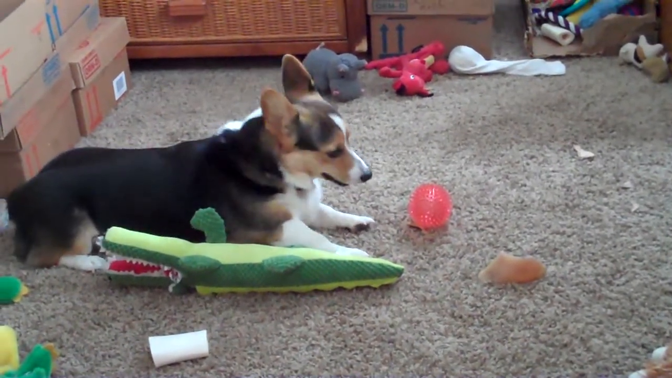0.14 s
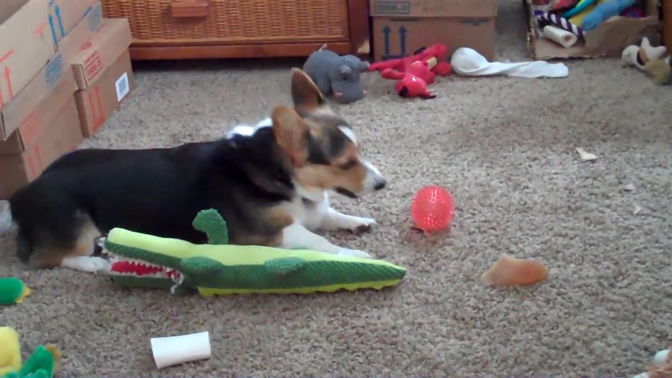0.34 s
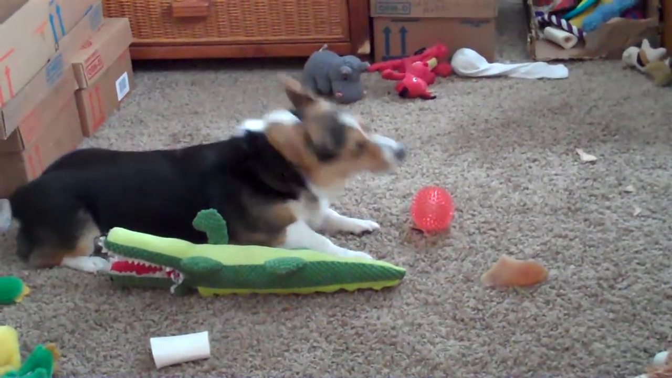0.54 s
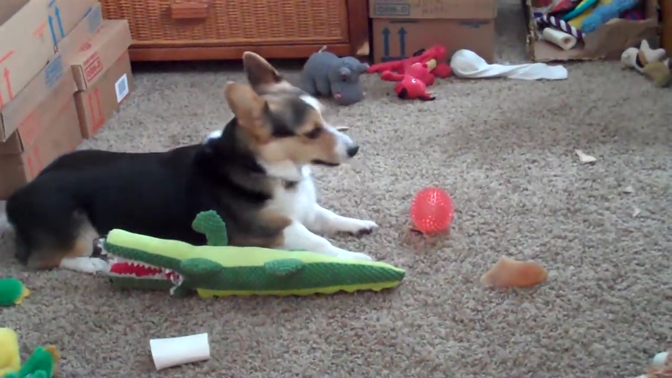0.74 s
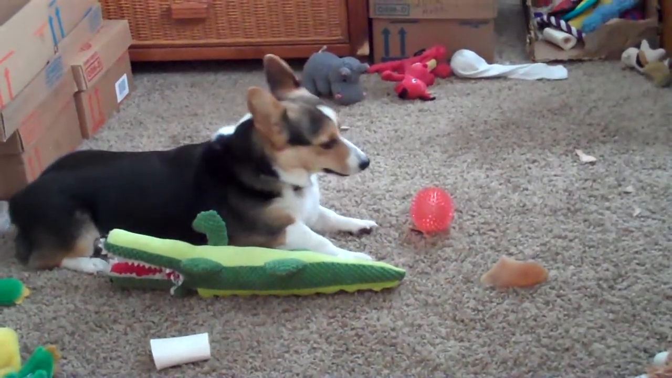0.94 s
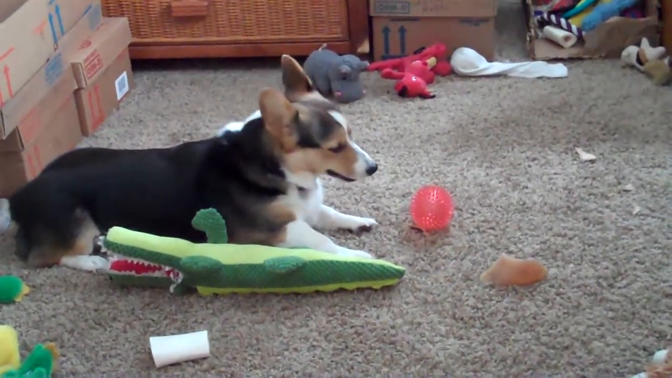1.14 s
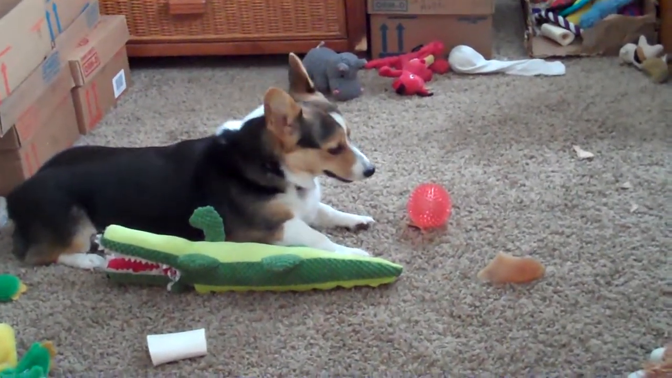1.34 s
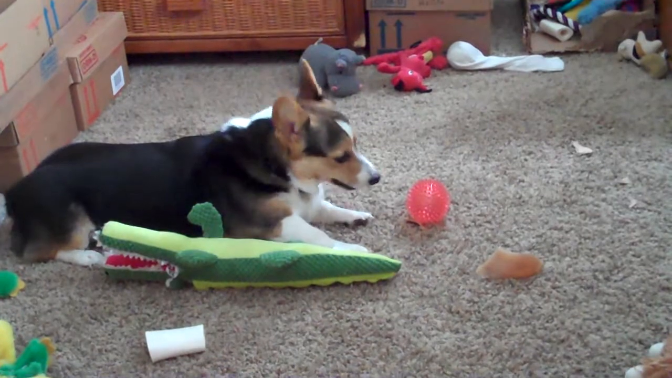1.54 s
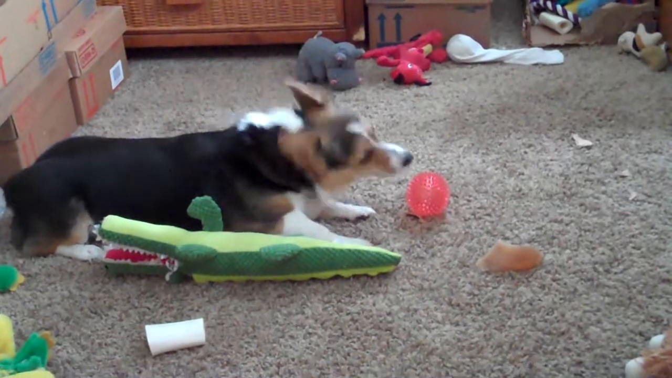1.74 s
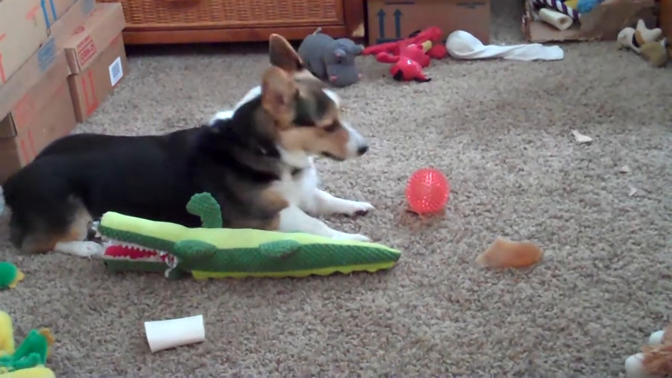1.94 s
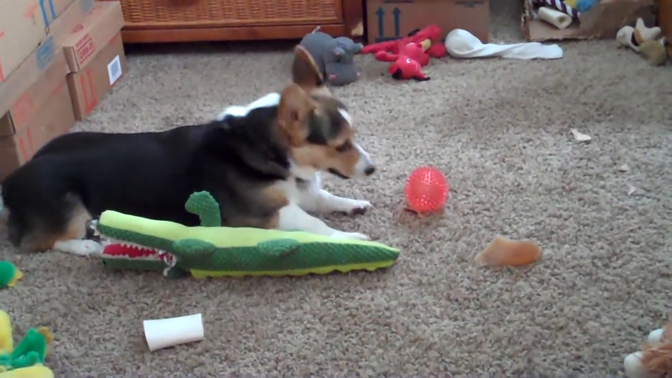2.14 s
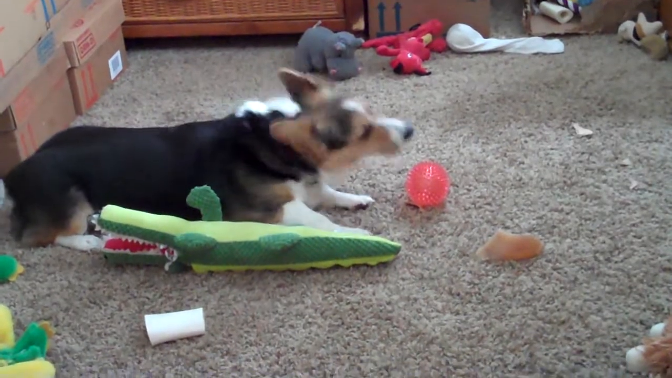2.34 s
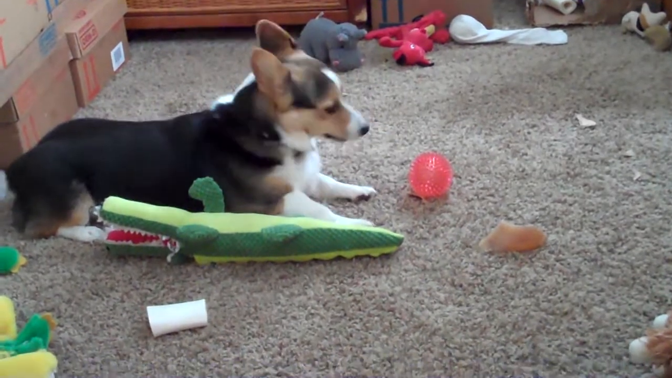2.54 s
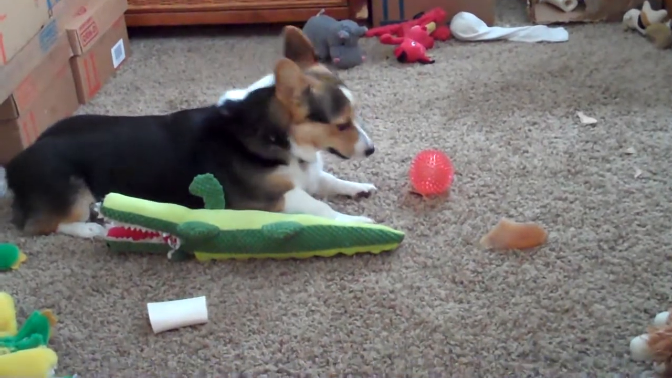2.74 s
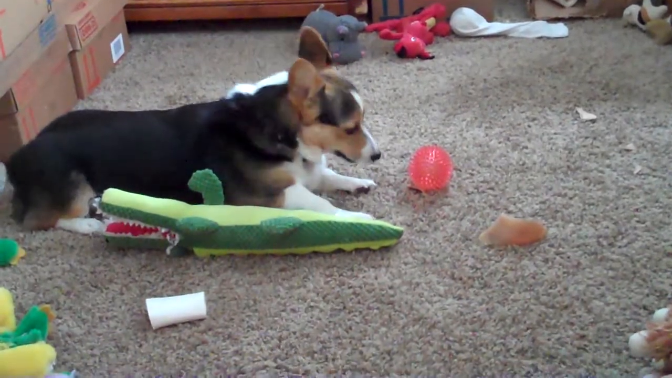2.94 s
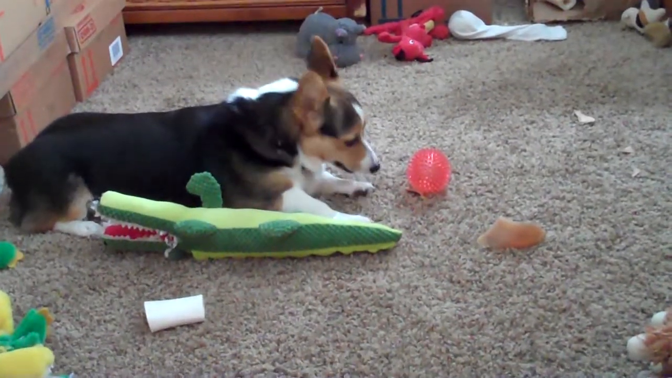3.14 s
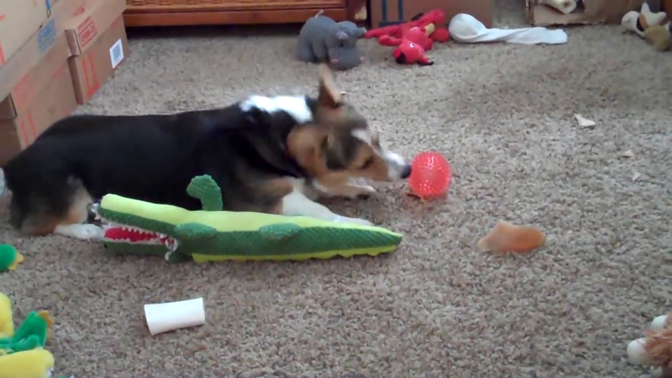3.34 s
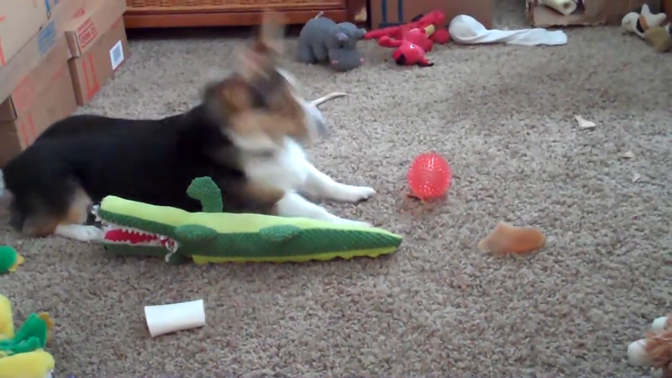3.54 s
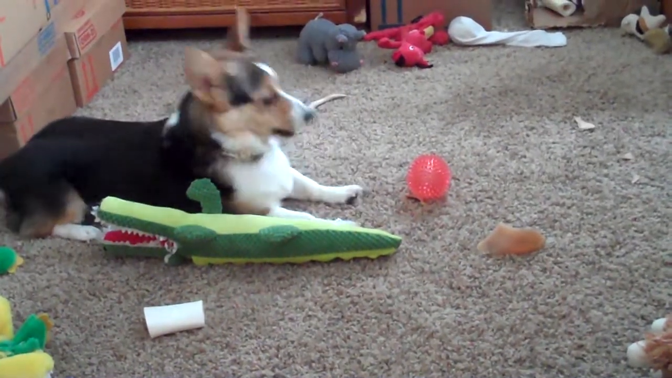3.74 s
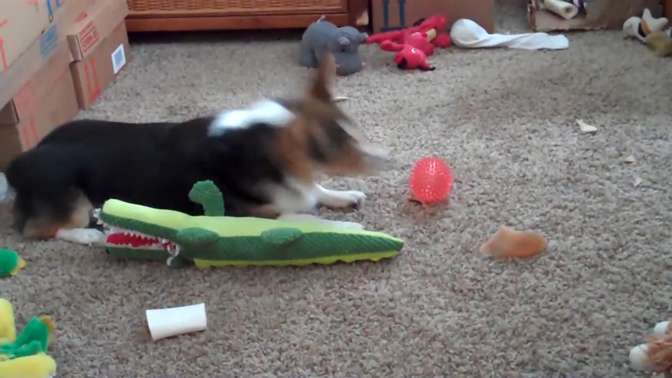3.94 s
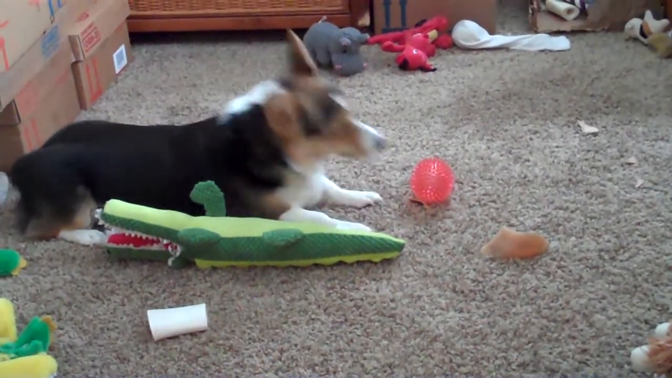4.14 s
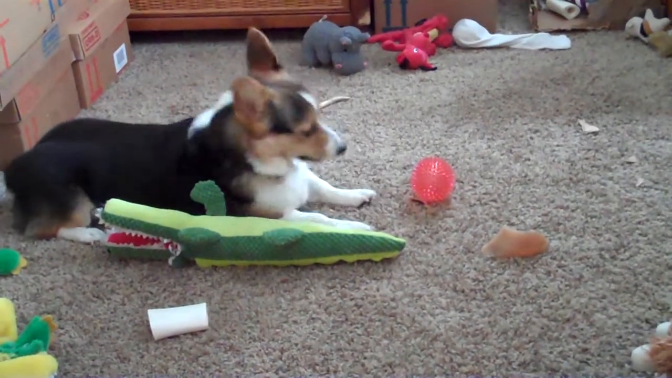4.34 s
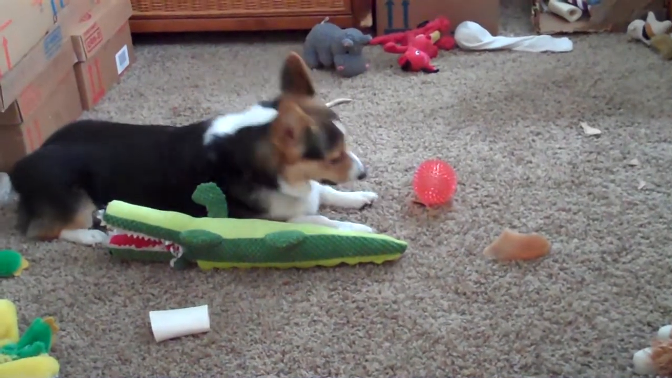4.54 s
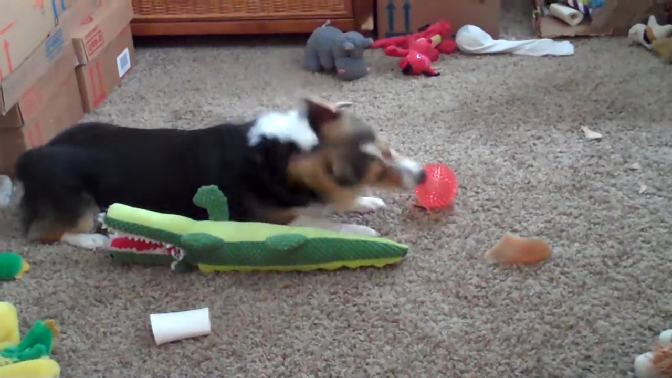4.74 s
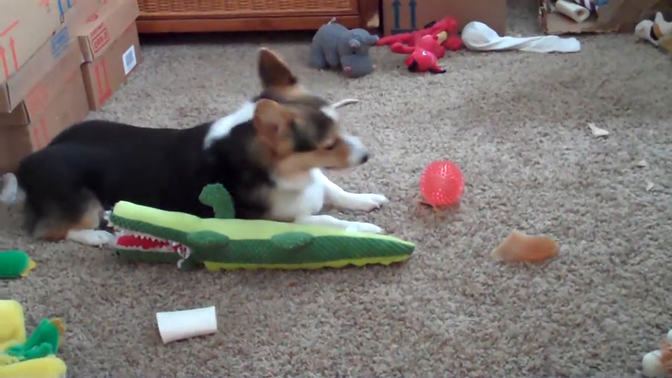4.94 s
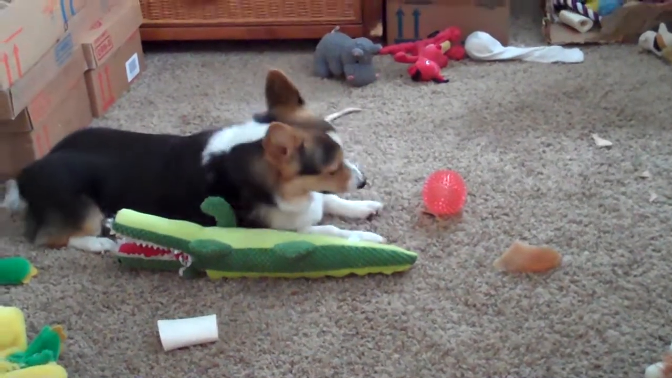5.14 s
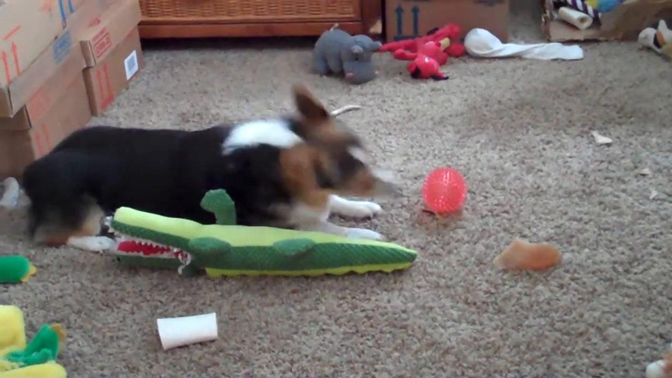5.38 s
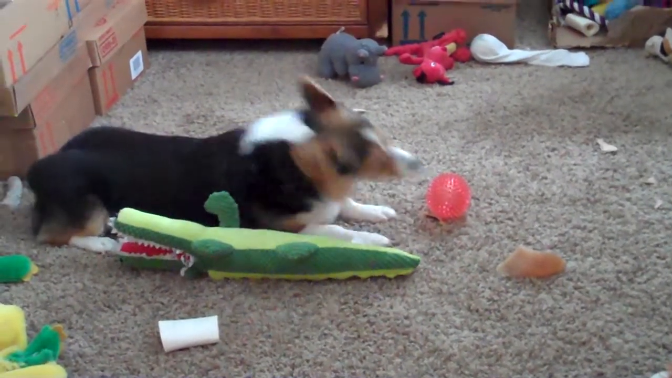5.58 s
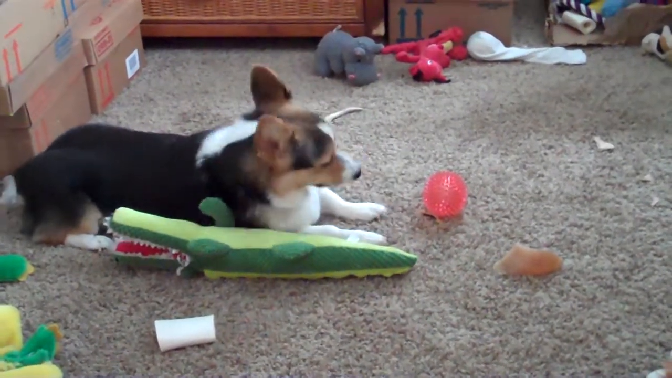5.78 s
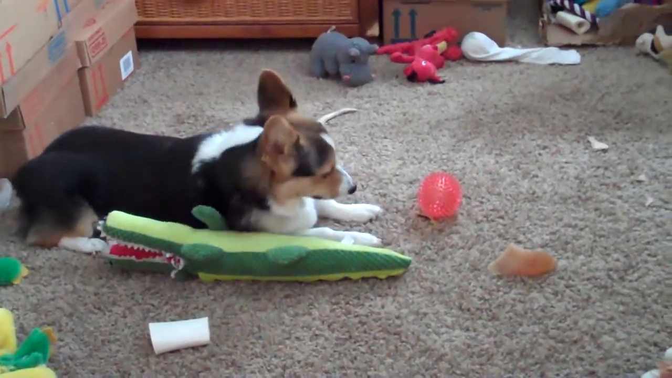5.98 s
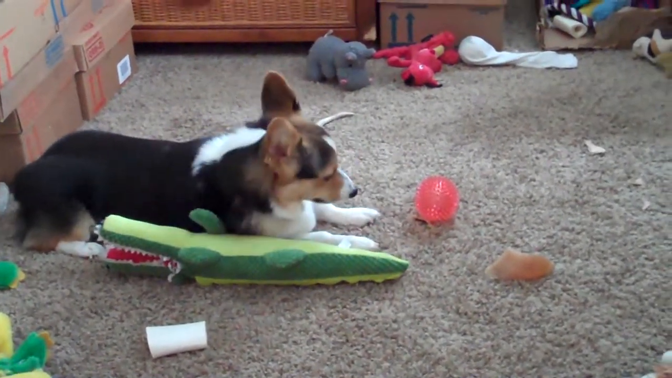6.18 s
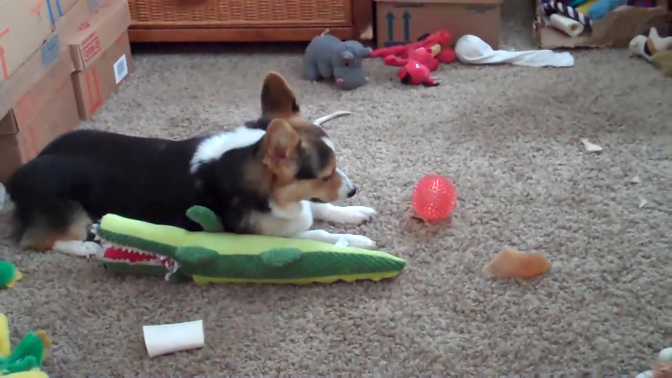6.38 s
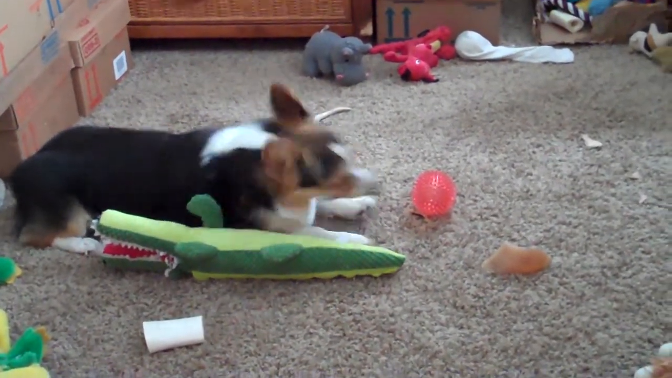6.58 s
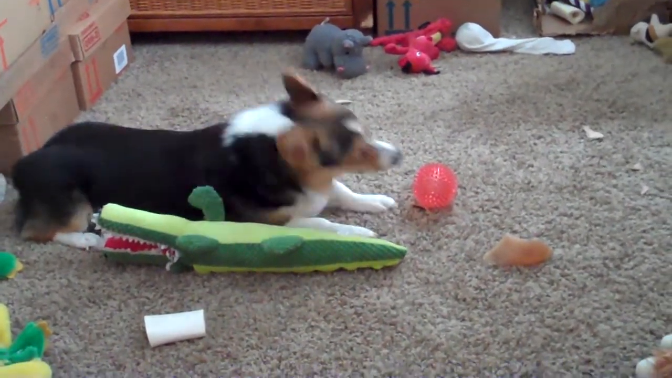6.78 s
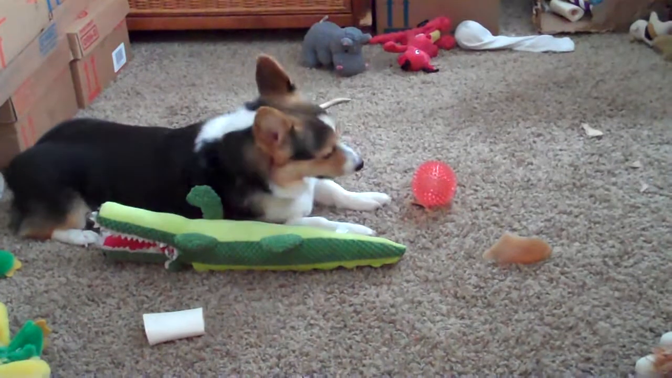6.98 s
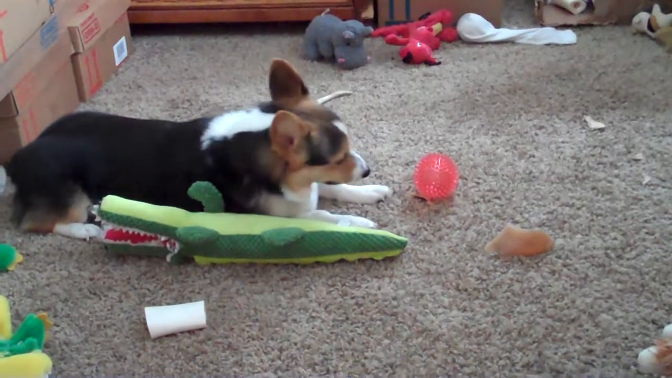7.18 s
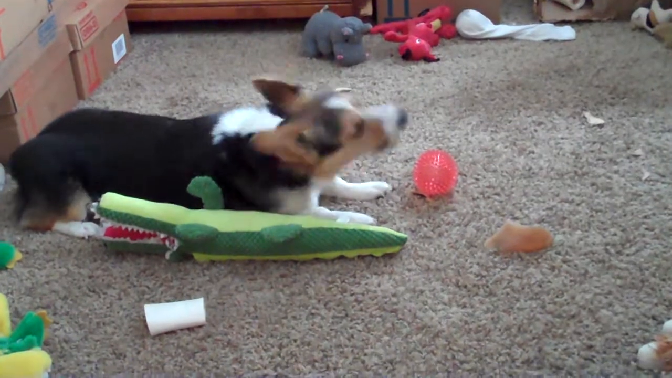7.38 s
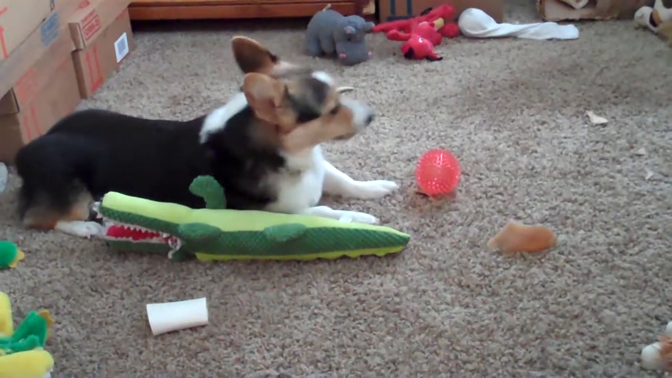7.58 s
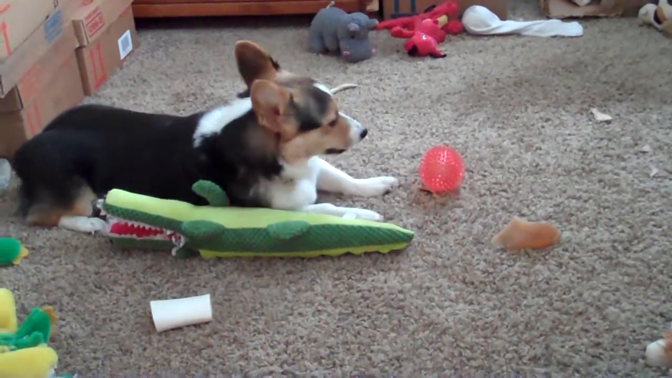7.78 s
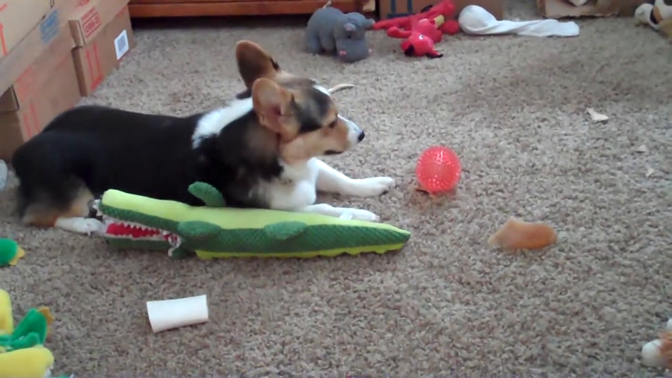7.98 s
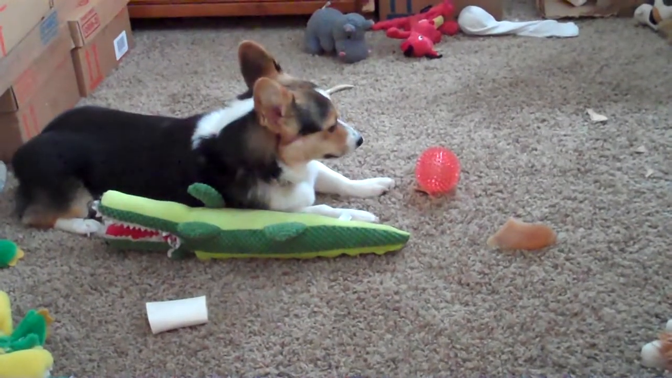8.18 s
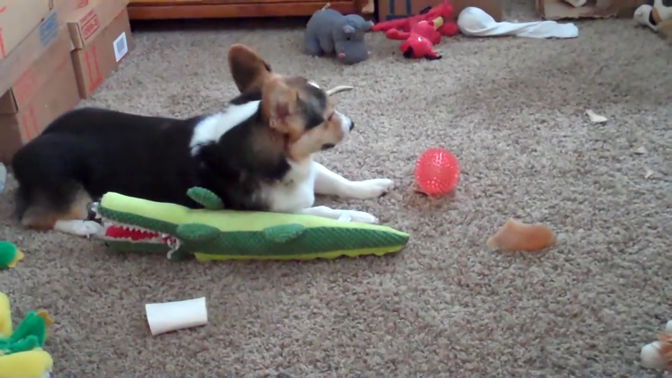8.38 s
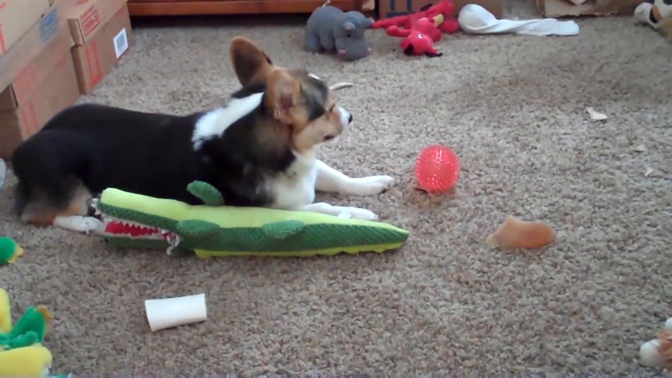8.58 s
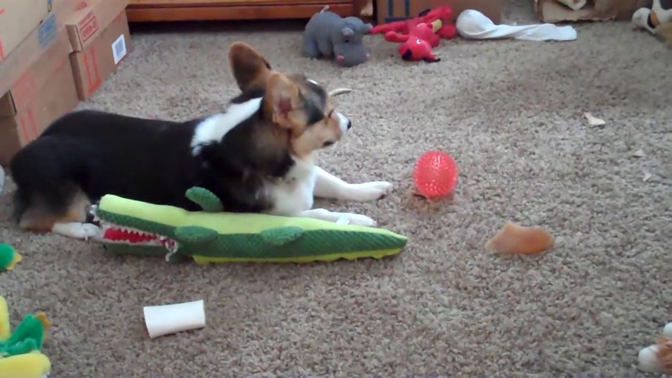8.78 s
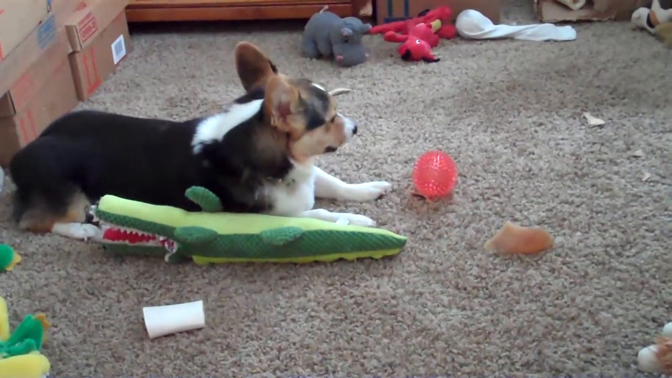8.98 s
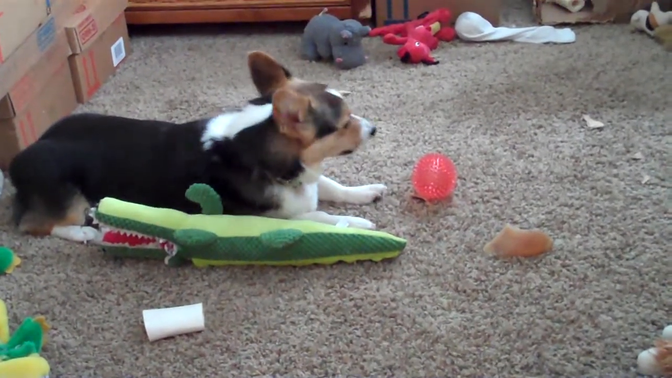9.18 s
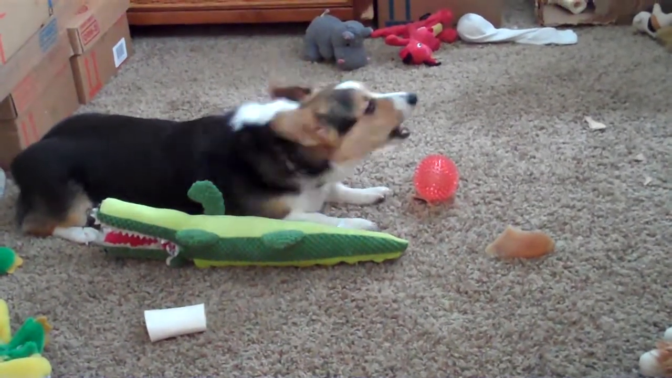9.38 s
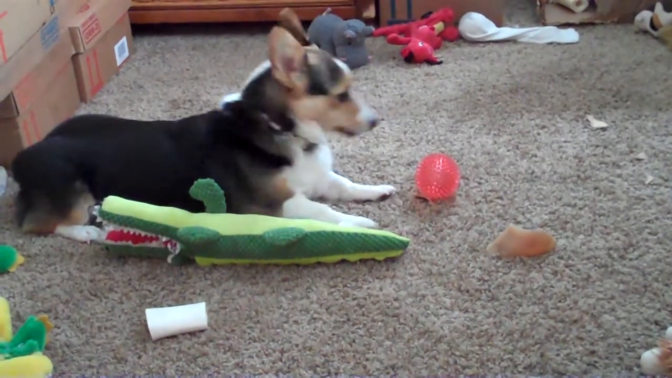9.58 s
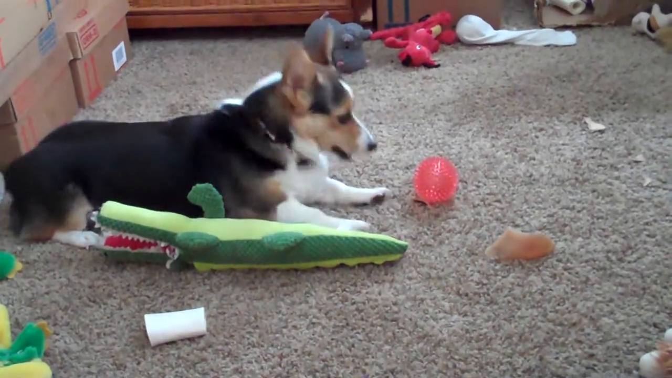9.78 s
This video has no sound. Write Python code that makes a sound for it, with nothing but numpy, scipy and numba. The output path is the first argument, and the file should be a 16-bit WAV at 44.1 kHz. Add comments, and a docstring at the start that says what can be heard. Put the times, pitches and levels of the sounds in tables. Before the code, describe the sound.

Close, sharp barks and softer gruff woofs from a small dog in a carpeted room, with short growls, sinking sighs and puffs of air between.

```python
"""A faint steady hiss fills a carpeted room; a small dog growls low close to a microphone, then barks.
Ten barks follow, several led in by growls: sharp ones start hoarse, lock into a falling tone and end in a
rasp; gruff woofs arch in pitch. Sinking sighs and short puffs of air come between them.
Pulse trains and noise drive resonances; noise bands ring as the walls; the loudest peaks are flattened."""
import sys
import numpy as np
from scipy import signal
from scipy.fft import rfft, irfft, next_fast_len
from scipy.io import wavfile
from scipy.ndimage import uniform_filter1d
from numba import njit

SR = 44100
rng = np.random.default_rng(int(sys.argv[2]) if len(sys.argv) > 2 else 0)


def transcribe(signal):
    """Save signal, clipped to [-1, 1], as a 16-bit WAV file at the path in sys.argv[1]."""
    frames = np.atleast_2d(signal).T
    limited = np.clip(frames, -1, 1)
    pcm = np.round(limited * 32767).astype(np.int16)
    wavfile.write(sys.argv[1], SR, pcm)


N = 433062

# Room hiss spectrum: [hz, relative_db_per_hz]
ROOM_HISS = [(25, 7), (60, -6), (130, -8.5), (330, -8), (700, -11), (1900, -13), (2700, -17.5), (6000, -24),
             (11000, -27.5), (15000, -42.5)]
ROOM_HISS_DB = -67

# Growls: [peak_s, rise_s, fall_s, peak_level_db, peak_lip_opening_db]
GROWLS = [(.46, 0.1, 0.21, -45.5, -10), (.535, 0.068, .02, -42, -13), (1.735, .11, 0.019, -45.5, -7.5),
          (2.37, 0.12, 0.078, -44, -6), (3.416, 0.045, 0.035, -34.5, -8), (4.745, 0.08, .02, -44, -17.5),
          (5.495, .075, 0.021, -42, -15), (6.695, 0.057, 0.024, -42, -12.5),
          (7.22, .09, 0.24, -53.5, -27.5), (7.43, .17, 0.026, -44, -13), (9.2, 0.077, 0.18, -27, -2.5),
          (9.42, 0.19, 0.09, -34.5, -8.5)]
# Growl resonances, lips closed and lips parted: [hz, width_hz, gain_db]
CLOSED_LIPS = [(195, 53, 1.5), (336.1, 50, 2), (674, 220, -4.5), (990, 340, -11.5)]
PARTED_LIPS = [(1560, 540, -3), (2550, 230, -6), (3500, 1200, -20)]
# Air past the teeth, spectrum: [hz, relative_db_per_hz]
TEETH_AIR = [(2500, -20.5), (3500, -5.5), (4300, -8), (5400, 1.5), (7500, -0.5), (10000, 2.5),
             (11500, -8.5), (13500, -15.5), (15000, -38.5)]
# Level and lip opening fall by these amounts on both sides of the peak
GROWL_DEPTH_DB, GROWL_LIPS_DB, GROWL_CURVE = 26, 8.5, 1.2

# Room ring by band: [hz, t60_s, level_db]
WALL_RING = [(150, 0.2, -12), (400, 0.44, -11), (824, 0.28, -8), (1480, 0.34, -8.5), (2260, 0.38, -8.5),
             (3400, 0.3, -8.5), (4400, 0.17, -7.5), (11000, 0.19, -6)]
# First echoes from floor, boxes and chest: [delay_s, gain]
FIRST_ECHOES = [(.0031, 0.12), (.0094, .14), (.0172, .12)]

# Sharp barks: [start_s (end of attack), attack_s, hoarse_s, tone_s, rasp_s,
#   hoarse_pitch_hz, tone_pitch_hz, sag_hz_per_s,
#   hoarse: roughness (0-1), bright_hz, throat_level_db, bright_re_throat_db,
#   tone: level_db, fade_db, mouth_re_throat_db, bright_re_throat_db,
#   rasp: level_db, roughness (0-1), mouth_re_throat_db, bright_re_throat_db, bright_hz]
SHARP_BARKS = [(0.55, 0.03, 0.025, 0.083, 0.019, 982.3, 750.4, 420, 0.81, 2750, -14, -3.5, -6.5, 11.5, -8.5, -15, -27, .14, -5.5, -5, 2200),
               (4.756, .027, .04, 0.032, 0.055, 885, 856, 2676, .88, 2740, -13, -5, -5.5, 1, -29.5, -20.5, -27, .4, -2, -0.5, 2330),
               (5.509, .028, .033, 0.047, .05, 902.3, 870, 2364, 0.83, 2915, -12.5, -6, -6, 2, -32, -22.5, -28, .4, 0.5, 4.5, 2300),
               (6.703, 0.031, 0.033, 0.051, .06, 880, 871.3, 2115, 0.76, 2825, -13.5, -5, -6, 2.5, -31, -16, -26.5, 0.49, 1, 4.5, 2340),
               (7.472, 0.068, .016, .047, .066, 690, 756.5, 302.6, .7, 2480, -16, 1.5, -6.5, 7, -10, -12.5, -21.5, 0.91, 7, -5, 2040),
               (9.465, .05, 0.0165, 0.055, 0.058, 680, 756, 162, 0.71, 2500, -18, 2.5, -3.5, 27, -11.5, -14, -20, .93, 3.5, -6, 1850)]
# Bark resonances; throat and mouth centres with the jaw not gaping
THROAT_HZ, THROAT_WIDTH_HZ = 768, 453
MOUTH_HZ, MOUTH_WIDTH_HZ = 1500, 460
EDGE_HZ, EDGE_WIDTH_HZ = 3250, 590
BRIGHT_WIDTH_HZ = 700
GAPE_BRIGHT_HZ, CLOSING_BRIGHT_HZ = 2760, 2320
# Jaw wide open: throat and bright are added to the hoarse values, mouth is re throat
GAPE_THROAT_DB, GAPE_MOUTH_DB, GAPE_BRIGHT_DB = 1.5, 1.5, 0.5
# Sharp-bark onset and lead, just before the snap
ONSET_DB, LEAD_DB, RELEASE_DB = -27.5, -12, -18
HOARSE_MOUTH_DB, LEAD_BRIGHT_DB = -8.5, -8
EDGE_PITCH_RATIO = 0.9  # at the start of a bark or woof and the end of a sharp bark
SNAP_SHARE = 0.4  # of the attack
LOCK_S, BREAK_S, RELEASE_S = 0.008, 0.0085, 0.03
# Overtones keep this share of the dB that the tone loses
TONE_ROUGHNESS, OVERTONE_SHARE = 0.035, 0.6
# End of the rasp; pitch is re end of tone
RASP_FADE_DB, CLOSED_MOUTH_DB, CLOSED_BRIGHT_DB = 2.5, -9, -12.5
RASP_PITCH_RATIO, CLOSED_ROUGHNESS = 0.81, 0.45

# Voice sinking as a bark runs out: [start_s, length_s, first_pitch_hz, level_db]
SIGHS = [(0.658, 0.11, 272, -53.5), (1.856, 0.21, 302, -49), (2.523, 0.17, 312, -44),
         (3.524, 0.12, 240, -46.5), (4.201, 0.11, 299.4, -42.5), (4.865, .13, 553, -45.5),
         (5.614, .14, 555, -47), (6.826, 0.14, 553, -47.5), (7.604, 0.099, 298, -57),
         (9.604, 0.1, 303.6, -45.5)]
SIGH_OCTAVES_PER_S = 6.5

# Air from the muzzle: [centre_s (peak of the swell), spread_s (Gaussian spread; the puff sounds for two spreads
# on each side of the peak), level_db, hz]
PUFFS = [(1.105, 0.026, -65, 1460), (3.636, 0.028, -53, 1611), (4.087, 0.023, -44, 1107),
         (4.121, 0.021, -45.5, 2226), (4.308, 0.056, -46.5, 1420), (6.073, 0.1, -71, 1400),
         (8.038, 0.05, -64.5, 1400)]
# Air through the muzzle, spectrum: [hz, relative_db_per_hz]
MUZZLE_AIR = [(200, -14), (480, -7.5), (750, -7), (1700, -4), (2400, 0), (3300, -8), (4500, -21),
              (6300, -16.5), (9500, -25.5), (13000, -32), (15000, -43)]

# Gruff woofs, some run together: [start_s (end of attack), attack_s, hold_s, release_s,
#   pitch_hz, pitch_arch (share), roughness (0-1), level_db,
#   mouth_re_throat_db, bright_re_throat_db, bright_hz]
WOOFS = [(1.76, 0.029, 0.013, 0.06, 488, .03, 0.45, -21.5, -10.5, -3.5, 2760),
         (1.796, 0.011, 0.018, .016, 497.7, 0.034, 0.09, -13.5, -8, -4.5, 2850),
         (1.82, 0.012, 0.025, 0.058, 523.3, 0.024, .24, -24, 3, 6, 2680),
         (2.416, 0.038, 0.019, 0.045, 710.5, .01, 0.84, -24, -3.5, -5, 2920),
         (2.449, 0.013, .016, 0.019, 750.6, 0.0053, 0.39, -15, -5.5, -6, 2625),
         (2.479, .014, .045, .05, 491.5, 0.017, 0.33, -23, 5, 4, 2670),
         (3.445, 0.034, 0.0575, 0.0793, 391.9, 0.028, 0.74, -18, -5.5, -6, 2734),
         (4.197, .038, .03, 0.049, 649, 0.016, 0.6, -20, -3.5, -2.5, 2640)]
# Level re peak at the start, end of hold and end of release
WOOF_ONSET_DB, WOOF_SAG_DB, WOOF_END_DB = -21.5, -3.5, -20
WOOF_OPENING_DB, WOOF_JAW_HZ = 2.5, 112.7  # swing to either side of the middle of the hold
WOOF_END_PITCH_RATIO, WOOF_EDGE_ROUGHNESS = 0.81, 0.72

OVERLOAD_PEAK = 0.68
TOP_HZ = 15000


def undb(db):
    """Decibels to gain."""
    return 10 ** (np.asarray(db) / 20)


def unit(x):
    """Scale to rms 1."""
    return x / np.sqrt(np.mean(x ** 2))


def even(x, size=360):
    """Hold the short-term rms near 1, keeping the fast flutter."""
    power = uniform_filter1d(uniform_filter1d(x ** 2, size), size // 2)
    return x / np.sqrt(np.abs(power) + 1e-12)


def wobble(n, hz):
    """Random line of rms 1 through hz new values a second."""
    values = rng.standard_normal(2000)
    return unit(np.interp(np.arange(n) * hz / SR, np.arange(2000), values))


def colour(x, points):
    """Filter by a spectrum of (Hz, dB) points; rms 1."""
    hz, db = np.transpose(points)
    size = next_fast_len(len(x))
    bin_hz = np.arange(size // 2 + 1) * SR / size
    gain = undb(np.interp(np.log(bin_hz + 1), np.log(hz), db))
    return unit(irfft(rfft(x, size) * gain, size)[:len(x)])


def low_pass(x, hz, order=8):
    """Steep roll-off above hz."""
    return signal.sosfilt(signal.butter(order, hz, fs=SR, output="sos"), x)


@njit
def moving_band_pass(x, hz, width_hz):
    """State-variable band-pass with a moving centre."""
    out, band, low = np.empty(len(x)), 0., 0.
    for i in range(len(x)):
        g = np.tan(np.pi * hz[i] / SR)
        damping = width_hz / hz[i]
        v = (band + g * (x[i] - low)) / (1 + g * (g + damping))
        band = 2 * v - band
        low += 2 * g * v
        out[i] = damping * v
    return out


def resonance(x, hz, width_hz):
    """A band-pass applied twice, for dark valleys."""
    centre_hz = hz * np.ones(len(x))
    once = moving_band_pass(x, centre_hz, float(width_hz))
    return moving_band_pass(once, centre_hz, float(width_hz))


def stages(lengths_s, *controls):
    """Each control moves in straight lines through its values, one stage after another."""
    corners_s = np.concatenate([[0], np.cumsum(np.abs(lengths_s))])
    t = np.arange(int(corners_s[-1] * SR)) / SR
    return [np.interp(t, corners_s, values) for values in controls]


def add(track, start_s, sound):
    """Mix a sound in at start_s with softened ends."""
    start = int(start_s * SR)
    part = (sound * signal.windows.tukey(len(sound), 0.06))[:N - start]
    track[start:start + len(part)] += part


def quiet():
    """Steady coloured noise that wavers a little in level."""
    level_db = ROOM_HISS_DB + 0.17 * wobble(N, 1)
    return colour(rng.standard_normal(N), ROOM_HISS) * undb(level_db)


def folds(hz, rough, jitter, shimmer_db, flutter_hz, count):
    """Vocal folds: a pulse train that grows uneven with roughness, plus air let through once a cycle."""
    n = len(hz)
    uneven_hz = hz * (1 + jitter * rough * wobble(n, flutter_hz))
    phase = 2 * np.pi * np.cumsum(uneven_hz) / SR
    pulses = sum(np.cos(k * phase) for k in range(1, count + 1))
    air = unit(rng.standard_normal(n) * (1 + np.cos(phase))) * np.sqrt(SR / hz / 4)
    mix = np.sqrt(1 - rough ** 2) * pulses + rough * air
    return mix * undb(shimmer_db * rough * wobble(n, flutter_hz))


def growl(rise_s, fall_s, peak_db, lips_db, pitch_hz=115):
    """Slow fold pulses behind closed lips; parting them adds roughness and lets air through upper resonances."""
    away = stages([rise_s, fall_s], [1, 0, 1])[0] ** GROWL_CURVE
    level_db = peak_db - GROWL_DEPTH_DB * away
    open_db = lips_db - GROWL_LIPS_DB * away
    n = len(level_db)
    rough = np.interp(open_db, [-20, -6], [0.35, 0.75])
    source = folds(np.full(n, pitch_hz), rough, jitter=0.034, shimmer_db=1.0, flutter_hz=111.7, count=36)
    airy = unit(source) + rng.standard_normal(n)
    closed = sum(undb(db) * resonance(source, hz, width) for hz, width, db in CLOSED_LIPS)
    closed = unit(low_pass(closed, 1300))
    parted = sum(undb(db) * resonance(airy, hz, width) for hz, width, db in PARTED_LIPS)
    parted = unit(low_pass(parted, 4300))
    # the throat resonance also grows as the mouth opens
    throat = unit(low_pass(resonance(source, 660, 310), 1100))
    hiss = colour(rng.standard_normal(n), TEETH_AIR)
    body = even(closed + undb(open_db + 14.0) * throat, size=1200)
    escaping = undb(open_db) * (parted + undb(-16.0) * hiss)
    return undb(level_db) * (body + escaping)


def room(dry, build_s=0.004):
    """Direct sound, a few first echoes, and a diffuse ring that dies at its own rate in each band."""
    t = np.arange(int(0.7 * SR)) / SR
    noise = rfft(rng.standard_normal(len(t)))
    log_hz = np.log(np.arange(len(noise)) * SR / len(t) + 1)
    log_centres = np.log([row[0] for row in WALL_RING])
    response = np.zeros(len(t))
    for pick, (_, t60_s, db) in zip(np.eye(len(WALL_RING)), WALL_RING):
        band = irfft(noise * np.interp(log_hz, log_centres, pick), len(t))
        decay = np.exp(-np.log(1000) * t / t60_s) * (1 - np.exp(-t / build_s))
        response += undb(db) * band * decay / np.sqrt(np.sum(decay ** 2))
    response[0] += 1
    for delay_s, gain in FIRST_ECHOES:
        response[int(delay_s * SR)] += gain
    return signal.fftconvolve(dry, response)[:N]


def bark(hz, rough, db, mouth_db, bright_db, bright_hz):
    """The folds drive four resonances: throat and mouth shift with the gape, bright moves, edge stays."""
    rough, n = np.clip(rough, 0.01, 0.95), len(hz)
    source = folds(hz, rough, jitter=0.07, shimmer_db=3.5, flutter_hz=422.1, count=8)
    # the tract passes little below its first resonance or above its last
    source = signal.sosfilt(signal.butter(4, 390, "high", fs=SR, output="sos"), source)
    source = low_pass(source, 3375, order=14)
    # a high, rough push gapes the jaw: the two low resonances draw together
    gape = rough * np.clip((hz - 770) / 110, 0, 1)
    throat = even(resonance(source, THROAT_HZ + 130 * gape, THROAT_WIDTH_HZ))
    mouth = even(resonance(source, MOUTH_HZ - 260 * gape, MOUTH_WIDTH_HZ))
    # the upper resonances carry more turbulence
    turbulence = unit(low_pass(rng.standard_normal(n), 3430, order=14))
    breathy = even(source) + 0.55 * rough ** 0.8 * turbulence
    edge = undb(-2.5) * rough ** (2 / 3) * resonance(breathy, EDGE_HZ, EDGE_WIDTH_HZ)
    bright = even(resonance(breathy, bright_hz, BRIGHT_WIDTH_HZ) + edge)
    hiss_db = -21.0 + 0.87 * bright_db + 2.5 * wobble(n, 350)
    hiss = colour(rng.standard_normal(n), TEETH_AIR) * rough ** 0.27 * undb(hiss_db)
    voice = undb(db) * (throat + undb(mouth_db) * mouth + undb(bright_db) * bright + hiss)
    # slack, uneven cycles rumble in the chest, mostly in the low-pitched barks
    slack = rough * np.clip((900 - hz) / 300, 0.1, 1)
    swell = signal.windows.tukey(n, 0.5)
    rumble = unit(resonance(rng.standard_normal(n), 290, 150))
    chest = swell * slack * undb(-37.5 + 0.25 * db) * rumble
    fade = np.interp(np.arange(n) / SR, [0, 0.01, n / SR - 0.018, n / SR], [0, 1, 1, 0])
    return (voice + chest) * fade


def sharp_bark(attack_s, hoarse_s, tone_s, rasp_s, hoarse_hz, tone_hz, sag_hz_per_s,
               rough, start_hz, hoarse_db, bright_db,
               tone_db, fade_db, tone_mouth_db, tone_bright_db,
               rasp_db, rasp_rough, rasp_mouth_db, rasp_bright_db, end_hz):
    """The jaw snaps open hoarse, the folds lock into a sagging tone, then rasp as the mouth closes."""
    low_hz = tone_hz - sag_hz_per_s * tone_s
    lift_db = OVERTONE_SHARE * fade_db
    closing_hz = low_hz * RASP_PITCH_RATIO
    lock_bright_hz = (GAPE_BRIGHT_HZ + CLOSING_BRIGHT_HZ) / 2
    # each state: pitch, roughness, throat level, mouth and bright shares, bright centre
    onset = (hoarse_hz * EDGE_PITCH_RATIO, rough, hoarse_db + ONSET_DB,
             HOARSE_MOUTH_DB, LEAD_BRIGHT_DB, start_hz)
    lead = (hoarse_hz, rough, hoarse_db + LEAD_DB, HOARSE_MOUTH_DB, LEAD_BRIGHT_DB, start_hz)
    hoarse = (hoarse_hz, rough, hoarse_db, HOARSE_MOUTH_DB, bright_db, start_hz)
    gaping = (hoarse_hz, rough, hoarse_db + GAPE_THROAT_DB,
              GAPE_MOUTH_DB, bright_db + GAPE_BRIGHT_DB, GAPE_BRIGHT_HZ)
    locked = (tone_hz, TONE_ROUGHNESS, tone_db, tone_mouth_db, tone_bright_db, lock_bright_hz)
    sagged = (low_hz, TONE_ROUGHNESS, tone_db - fade_db,
              tone_mouth_db + lift_db, tone_bright_db + lift_db, CLOSING_BRIGHT_HZ)
    broken = (low_hz, rasp_rough, rasp_db, rasp_mouth_db, rasp_bright_db, end_hz)
    raspy = (low_hz * (1 + RASP_PITCH_RATIO) / 2, rasp_rough, rasp_db - RASP_FADE_DB / 2,
             rasp_mouth_db, rasp_bright_db - RASP_FADE_DB, end_hz)
    closing = (closing_hz, CLOSED_ROUGHNESS, rasp_db - RASP_FADE_DB,
               CLOSED_MOUTH_DB, CLOSED_BRIGHT_DB, CLOSING_BRIGHT_HZ)
    closed = (closing_hz * EDGE_PITCH_RATIO, CLOSED_ROUGHNESS, rasp_db + RELEASE_DB,
              CLOSED_MOUTH_DB, CLOSED_BRIGHT_DB, CLOSING_BRIGHT_HZ)
    lengths_s = [attack_s * (1 - SNAP_SHARE), attack_s * SNAP_SHARE, hoarse_s, LOCK_S,
                 tone_s - LOCK_S, BREAK_S, rasp_s / 2, rasp_s / 2, RELEASE_S]
    states = [onset, lead, hoarse, gaping, locked, sagged, broken, raspy, closing, closed]
    return bark(*stages(lengths_s, *zip(*states)))


def sigh(length_s, first_hz, db):
    """Slackening folds glide down unevenly with only three harmonics."""
    n = int(length_s * SR)
    glide_hz = first_hz * 2 ** (-SIGH_OCTAVES_PER_S * np.arange(n) / SR)
    phase = 2 * np.pi * np.cumsum(glide_hz * (1 + 0.08 * wobble(n, 200))) / SR
    tone = np.sin(phase) + np.sin(2 * phase) + undb(-3.5) * np.sin(3 * phase)
    swell = np.interp(np.linspace(0, 1, n), [0, 0.25, 1], [0, 1, 0])
    return tone * undb(db + 3.2 * wobble(n, 150)) * swell


def puff(spread_s, db, hz):
    """Unvoiced air swells and fades through the muzzle, partly through one resonance."""
    reach = int(2 * spread_s * SR)
    t = np.arange(-reach, reach) / SR
    air = rng.standard_normal(len(t))
    swell = np.exp(-(t / spread_s) ** 2 / 2)
    breath = colour(air, MUZZLE_AIR) + 0.43 * unit(resonance(air, hz, 260))
    return undb(db) * swell * unit(breath)


def woof(attack_s, hold_s, release_s, hz, arch, rough, db, mouth_db, bright_db, bright_hz):
    """A softer push: pitch arches a little, the edges are rough, mouth and bright shares rise with opening."""
    pitch_ratio, rough, push_db, opening = stages(
        [attack_s, hold_s / 2, hold_s / 2, release_s],
        [EDGE_PITCH_RATIO, 1 - arch, 1 + arch, 1, WOOF_END_PITCH_RATIO],
        [WOOF_EDGE_ROUGHNESS, rough, rough, rough, WOOF_EDGE_ROUGHNESS],
        [WOOF_ONSET_DB, 0, 0, WOOF_SAG_DB, WOOF_END_DB],
        [-1, -1, 0, 1, 0])
    open_db = WOOF_OPENING_DB * opening
    moving_hz = bright_hz - WOOF_JAW_HZ * opening
    return bark(hz * pitch_ratio, rough, db + push_db, mouth_db + open_db, bright_db + open_db, moving_hz)


def scene():
    """The dog in its room."""
    dog = np.zeros(N)
    for peak_s, rise_s, *shape in GROWLS:
        add(dog, peak_s - rise_s, growl(rise_s, *shape))
    for start_s, attack_s, *shape in SHARP_BARKS:
        add(dog, start_s - attack_s, sharp_bark(attack_s, *shape))
    for start_s, *shape in SIGHS:
        add(dog, start_s, sigh(*shape))
    for centre_s, spread_s, db, hz in PUFFS:
        add(dog, centre_s - 2 * spread_s, puff(spread_s, db, hz))
    for start_s, attack_s, *shape in WOOFS:
        add(dog, start_s - attack_s, woof(attack_s, *shape))
    return (room(dog) + quiet())[None]


def record(dry):
    """The microphone flattens the loudest peaks, slightly unequally by side; the top is cut."""
    limit = OVERLOAD_PEAK * (1 + 0.0055 * np.tanh(3 * dry))
    held = dry / (1 + (dry / limit) ** 8) ** (1 / 8)
    return signal.sosfilt(signal.ellip(8, 0.2, 70, TOP_HZ, fs=SR, output="sos"), held)


dry = scene()
out = record(dry)
transcribe(out)
```